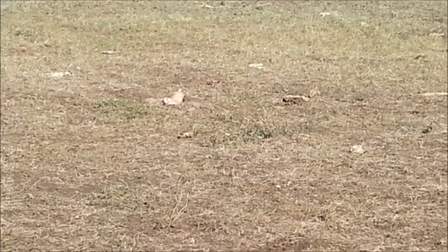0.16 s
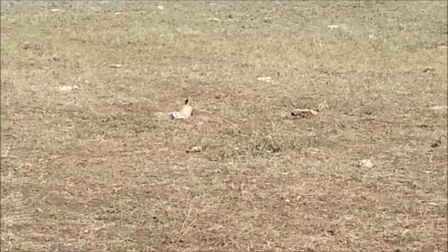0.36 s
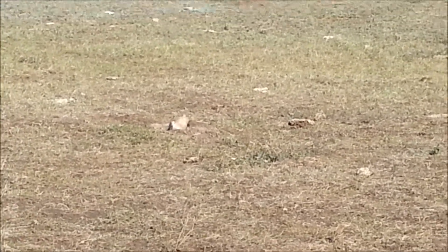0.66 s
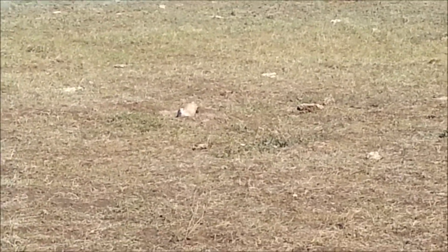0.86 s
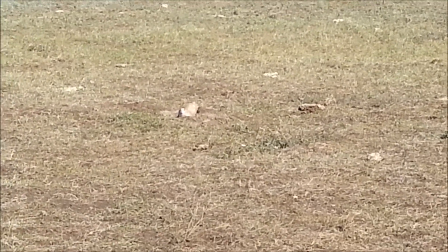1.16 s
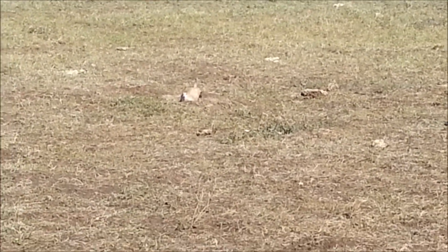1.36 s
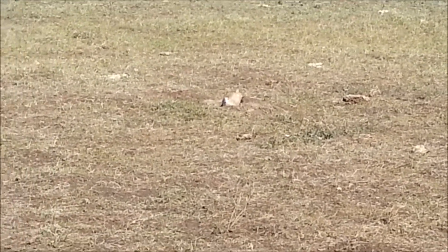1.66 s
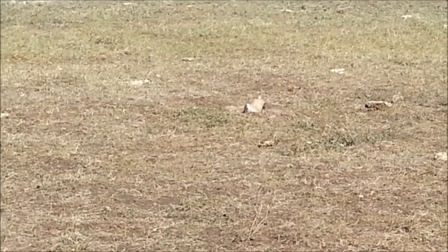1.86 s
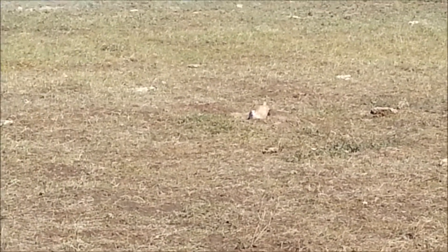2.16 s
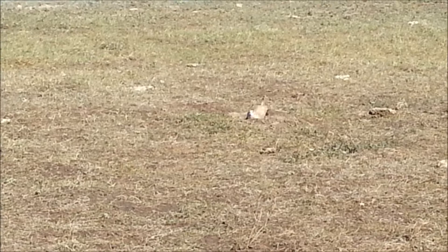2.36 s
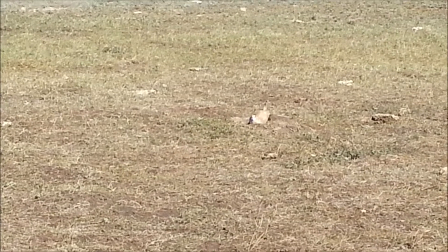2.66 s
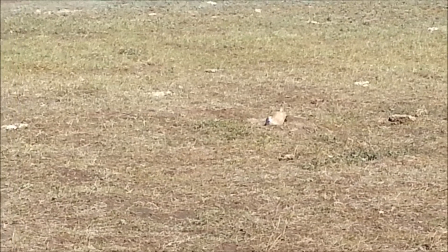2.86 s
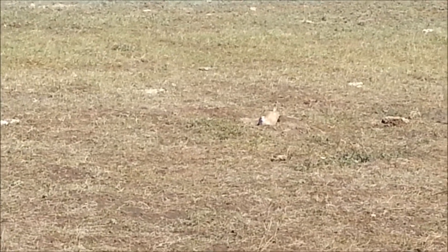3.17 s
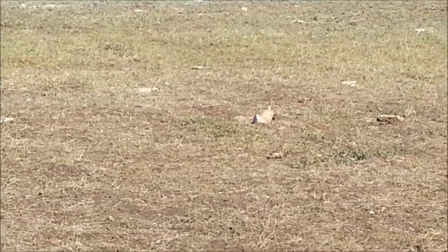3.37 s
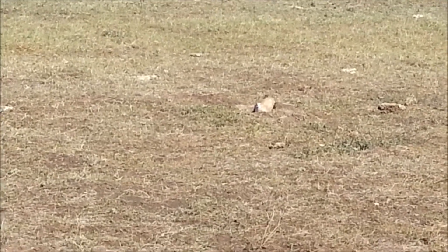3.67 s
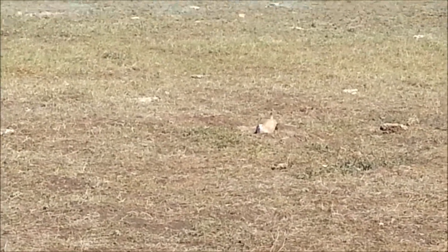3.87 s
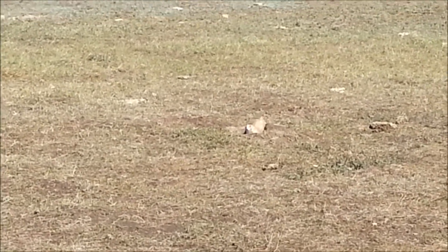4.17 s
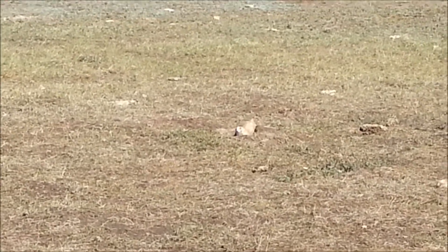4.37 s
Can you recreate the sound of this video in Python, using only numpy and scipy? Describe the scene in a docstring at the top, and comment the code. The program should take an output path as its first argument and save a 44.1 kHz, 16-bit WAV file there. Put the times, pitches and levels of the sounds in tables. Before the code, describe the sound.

A prairie dog gives four short, sharp, rough-edged yips in open grassland while another barks steadily far off and dry grass ticks nearby.

```python
"""Four short arched yips of a near prairie dog that turn rough partway, each trailed by a soft squeak or two.
A second animal barks in a series from far off; dry grass rustles and ticks close by, breeze bumps the left port.
Barks are harmonics and breath noise in throat resonances, squeaks are falling sine tones, grass is noise
grains and damped clicks, and the breeze is filtered noise and low clicks over a steady stereo hiss."""
import sys
import numpy as np
from scipy import signal
from scipy.fft import rfft, irfft, next_fast_len
from scipy.io import wavfile
from scipy.ndimage import uniform_filter1d

SR = 44100
rng = np.random.default_rng(int(sys.argv[2]) if len(sys.argv) > 2 else 0)


def master_out(mix):
    """Clip the mix to full scale and print it as 16-bit PCM to the path in sys.argv[1]."""
    frames = np.transpose(np.atleast_2d(mix))
    ceiling = np.clip(frames, -1, 1)
    pcm = np.round(ceiling * 32767).astype(np.int16)
    wavfile.write(sys.argv[1], SR, pcm)


N = 198869
TIME = np.arange(N) / SR
# throat resonances of the near animal: [f/Hz, width/Hz, level/dB]
THROAT = [(1835, 730, -1), (3595, 467, 7), (3750, 230, -3), (6015, 570, -2), (7740, 320, -15.5),
          (9880, 440, -20)]


def from_db(db):
    """Decibels to gain."""
    return 10 ** (np.asarray(db) / 20)


def rms_one(x):
    """Scale to rms 1."""
    return x / np.sqrt(np.mean(x ** 2) + 1e-20)


def curve(rows, at):
    """Each column of a table, joined by straight lines."""
    key, *columns = np.transpose(rows)
    return [np.interp(at, key, c) for c in columns]


def per_bin(points):
    """A table over log frequency, read at every FFT bin."""
    hz, value = np.transpose(points)
    bin_hz = np.fft.rfftfreq(next_fast_len(N), 1 / SR)
    return np.interp(np.log(bin_hz + 1), np.log(hz), value)


def weigh(x, gain):
    """Filter by a gain for every FFT bin."""
    size = next_fast_len(N)
    return irfft(rfft(x, size) * gain, size)[..., :N]


def colour(x, points):
    """Filter by a table of [f/Hz, gain/dB]."""
    return weigh(x, from_db(per_bin(points)))


def drift(rate, size):
    """Random wander of spread about 1: `rate` new values a second, joined by straight lines."""
    steps = np.arange(size) / SR * rate
    return np.interp(steps, np.arange(size), rng.standard_normal(size)) * np.sqrt(3 / 2)


def resonate(x, hz, width_hz):
    """A resonance applied twice: gain about 1 on top, steep skirts."""
    r = np.exp(-np.pi * width_hz / SR)
    edge = (1 - r * r) / 2
    section = [edge, 0, -edge, 1, -2 * r * np.cos(2 * np.pi * hz / SR), r * r]
    return signal.sosfilt([section, section], x + 1e-18)


def add(track, s, sound):
    """Mix a sound into a track at time s."""
    i = max(round(s * SR), 0)
    track[i:i + len(sound)] += sound[:max(N - i, 0)]


def blip(hz, relative_width, size=1500):
    """One impulse in a heavily damped resonance; peak 1."""
    wave = resonate(signal.unit_impulse(size), hz, hz * relative_width)
    return wave / np.abs(wave).max()


def envelope(t, length, attack_s, release_db_per_s):
    """Straight attack, hold until `length`, exponential release."""
    return np.clip(t / attack_s, 0, 1) * from_db(-release_db_per_s * np.maximum(t - length, 0))


def ground(x, wet_db, t60):
    """Tufts and mounds scatter a brief, faint tail, different at each port."""
    t = np.arange(SR // 4) / SR
    scatter = rng.standard_normal((2, len(t))) * from_db(-60 * t / t60) * (t > .003)
    scatter /= np.sqrt(np.sum(scatter ** 2, axis=1, keepdims=True))
    return x + from_db(wet_db) * signal.fftconvolve(x[None], scatter, axes=1)[:, :N]


def air():
    """Steady outdoor hush and microphone hiss: shaped noise, unrelated at the two ports."""
    # colour of still air and microphone hiss: [f/Hz, relative density/dB per Hz]
    hush_colour = [(20, -40), (45, -15), (90, -2), (150, -1), (270, -7.5), (600, -9.5), (1200, -10.5),
                   (2200, -14.5), (3600, -15), (5000, -20.5), (6500, -23.5), (9500, -20), (14500, -21)]
    # how much louder the air is on the left: [f/Hz, difference/dB]
    balance = [(30, -8), (70, -13.5), (150, 0), (700, -1.5), (2500, 2.5), (5000, 0), (9000, -2)]
    level_db = -55.5
    spectrum_db = per_bin(hush_colour) + np.array([[1], [-1]]) * per_bin(balance) / 2
    return from_db(level_db) * rms_one(weigh(rng.standard_normal((2, N)), from_db(spectrum_db)))


def breeze(rumble_db, eddy_db, bump_db, lumpy_db):
    """Air at the left port: a lumpy rumble and small eddies that follow the breeze, and single strong bumps."""
    # strength of the breeze, ahead of the rumble and eddy gains: [t/s, level/dB]
    strength = [(0.0, -63.5), (0.11, -68), (0.35, -67), (0.9, -56), (1.79, -58), (2.54, -60), (3.39, -53.5),
                (4.27, -61.5), (4.51, -59)]
    # colour of the rumble: [f/Hz, relative density/dB per Hz]
    rumble_colour = [(30, -19), (70, -15), (140, 3.5), (260, 0.5), (400, -7.5), (700, -26), (2000, -29)]
    # strong bumps, ahead of the bump gain and low-pass: [t/s, peak/dB, centre f/Hz]
    strong_bumps = [(0.666, -33, 276), (0.677, -29.5, 255), (0.744, -40, 251), (0.835, -40, 214),
                    (1.003, -34, 292), (1.054, -33, 295), (1.07, -43, 217), (1.09, -41, 230),
                    (1.308, -36, 225), (1.651, -31.5, 394), (1.774, -40, 242), (1.898, -41, 215),
                    (2.311, -39.5, 254), (3.012, -39, 202), (3.376, -36.5, 231), (3.388, -34.5, 284),
                    (3.399, -38, 241), (3.806, -41.5, 200)]
    eddies_per_s, eddy_hz, eddy_spread_db = 20, 238, 3
    bump_width = 0.63   # bandwidth as a share of the centre

    level_db, = curve(strength, TIME)
    lumpy_noise = rng.standard_normal(N) * from_db(lumpy_db * drift(40, N))
    rumble = from_db(level_db + rumble_db) * rms_one(colour(lumpy_noise, rumble_colour))

    kick_gain = from_db(eddy_spread_db * rng.uniform(-1, 1, N))
    kicks = (rng.random(N) < eddies_per_s / SR) * kick_gain
    eddies = rms_one(resonate(kicks, eddy_hz, eddy_hz * bump_width))
    bumps = from_db(level_db + eddy_db) * eddies
    for s, peak_db, hz in strong_bumps:
        add(bumps, s, from_db(peak_db + bump_db) * blip(hz, bump_width))
    bumps = signal.sosfilt(signal.butter(4, 780, fs=SR, output="sos"), bumps)
    # rows are left and right: very little reaches the right port
    return rumble * from_db([[0], [-24]]) + bumps * from_db([[0], [-32]])


def grass(rustle_db, tick_db, grains_per_s):
    """Dry stalks: short rustles of tiny random grains, and clear snaps as damped clicks."""
    # rustles, ahead of the rustle gain: [t/s, length/s, level/dB]
    rustles = [(.105, 0.017, -64), (0.974, .13, -54), (2.9, 0.12, -63.5), (3.239, 0.054, -52),
               (3.33, 0.11, -58), (4.29, 0.031, -56.5), (4.43, .08, -65.5)]
    # colour of the rustle: [f/Hz, gain/dB]
    rustle_colour = [(300, -1.5), (900, 0), (2200, -2), (3800, -5), (5200, -15.5), (14000, -24.5)]
    # stalks snapping, ahead of the tick gain and colour: [t/s, peak/dB, centre f/Hz]
    ticks = [(0.119, -40, 904), (0.294, -40.5, 1860), (0.983, -37.5, 1270), (0.994, -39, 1410),
             (1.08, -39, 1760), (1.095, -34, 1420), (1.14, -42, 1360), (2.232, -46, 920),
             (2.549, -36.5, 1250), (2.715, -41, 2900), (2.952, -44, 850), (3.245, -26.5, 1090),
             (3.256, -25.5, 1220), (4.31, -45.5, 2430)]
    # colour of the snaps: [f/Hz, gain/dB]
    tick_colour = [(300, 11), (600, 1), (1100, -4), (1700, -10.5), (2600, -8.5), (4500, -4.5), (7000, -7),
                   (14000, -14)]
    attack_s, release_db_per_s = 0.0064, 313
    tick_width = 1   # bandwidth as a share of the centre

    stir = from_db(-63.5)   # the grass stirs faintly all the time
    for s, length, level_db in rustles:
        stir = stir + from_db(level_db) * envelope(TIME - s, length, attack_s, release_db_per_s)
    clumping = from_db(2.7 * drift(160, N))
    grains = (rng.random(N) < grains_per_s / SR) * rng.standard_normal(N) * clumping
    rustle = stir * from_db(rustle_db) * rms_one(colour(grains, rustle_colour))

    snaps = np.zeros(N)
    for s, peak_db, hz in ticks:
        add(snaps, s, from_db(peak_db + tick_db) * blip(hz, tick_width))
    snaps = ground(colour(snaps, tick_colour), wet_db=-4, t60=0.012)
    rustle = ground(rustle, wet_db=-2.0, t60=0.016)
    return rustle * from_db([[1], [-3]]) + snaps * from_db([[0], [-1.5]])


def throat(x, resonances, leak_db):
    """Parallel resonances of throat and mouth, with a little treble passing above them."""
    ringing = sum(from_db(db) * resonate(x, hz, width) for hz, width, db in resonances)
    return ringing + from_db(leak_db) * resonate(x, 10200, 3400)


def bark(row, resonances, pitch_arch, flutter_hz, rasp, breath_db, hiss_db, size=3000):
    """Vocal folds on an arch of pitch; partway they break with a rasp into a flutter that splits every harmonic."""
    s, length, top_hz, level_db, fundamental_db, clean, depth = row
    t = np.arange(size) / SR
    along = t / length
    # pitch scoops up, then sags ever faster
    scoop, scoop_s, sag, sag_power = pitch_arch
    arch = 1 - scoop * np.exp(-(t / scoop_s) ** 2) - sag * np.minimum(along, 1.1) ** sag_power
    # it opens abruptly, swells to full strength, holds and is cut off
    attack_s, swell_db, swell_s, release_db_per_s = 0.0024, 10, 0.0092, 3600
    push = envelope(t, length, attack_s, release_db_per_s) * from_db(-swell_db * np.exp(-t / swell_s))

    rough = np.clip((along - clean) * 12, 0, 1)
    # turbulence is strongest just after the break, and where the flutter stays shallow
    burst = rough * from_db(-14 * np.maximum(along - clean, 0) - 5.4 * depth)
    flutter = 2 * np.pi * np.cumsum(flutter_hz * (1 + 0.13 * drift(172, size))) / SR
    jitter = .0045   # pitch unsteadiness of the clean voice, as a share
    pitch = top_hz * arch * (1 + (jitter + rasp * burst) * drift(2523, size))
    phase = 2 * np.pi * np.cumsum(pitch) / SR

    source = from_db(breath_db) * (0.19 + burst) * rng.standard_normal(size)
    # deep flutter presses the voice and thins its fundamental
    pressed_db = -9 * rough * depth
    for k, db in enumerate([fundamental_db + pressed_db, 0, 0, -3, -8, -7, -7], 1):
        sidebands = np.sin(k * phase + flutter) + .55 * np.sin(k * phase - flutter)
        source = source + from_db(db) * (np.sin(k * phase) + rough * depth * sidebands)
    voice = throat(source, resonances, leak_db=-45.5)
    # the push of air sets the loudness, whichever harmonic carries it
    voice = voice / np.sqrt(uniform_filter1d(voice ** 2, size=70) + 1e-4)
    hiss = from_db(hiss_db) * (0.23 + burst) * resonate(rng.standard_normal(size), 13200, 5300)
    return from_db(level_db) * push * (voice + hiss)


def far_dog():
    """A lower-voiced neighbour, dulled by distance: the same kind of bark through fewer throat resonances."""
    # a steady series: [t/s, length/s, top pitch f/Hz, level/dB, share of the bark that stays clean]
    far_barks = [(0.099, 0.026, 1670, -52.5, 0.38), (0.475, 0.039, 1630, -52.5, .4),
                 (0.837, 0.039, 1692, -50.5, 0.18), (1.227, 0.031, 1690, -51, 0.36),
                 (1.583, 0.039, 1626, -51, 0.32), (1.964, 0.03, 1574, -53, 0.87),
                 (2.718, 0.039, 1626, -51, 0.3), (3.055, .037, 1665, -50.5, .3),
                 (3.46, 0.041, 1677, -48, 0.3), (3.849, 0.041, 1543, -51.5, 0.62),
                 (4.224, 0.037, 1640, -51, 0.41)]
    # throat resonances: [f/Hz, width/Hz, level/dB]
    far_throat = [(1690, 680, 0.5), (3020, 430, 0), (7050, 670, -18)]
    # arch of pitch: [scoop/share of top pitch, scoop time/s, sag at the end/share, power of the sag]
    far_arch = (.14, .0085, .185, 1.9)
    fundamental_db, flutter_depth = -1.5, 0.6
    voice = np.zeros(N)
    for s, length, top_hz, level_db, clean in far_barks:
        row = (s, length, top_hz, level_db, fundamental_db, clean, flutter_depth)
        yip = bark(row, far_throat, far_arch, flutter_hz=308.6, rasp=0.07, breath_db=3, hiss_db=-45)
        add(voice, s, yip)
    return ground(voice, wet_db=-13, t60=.07) * from_db([[0], [-7]])


def near_dog():
    """The near animal; its sound reaches the right port a hair earlier and shaded unevenly over the spectrum."""
    # [t/s, length/s, top pitch f/Hz, level/dB, fundamental/dB, share that stays clean, flutter depth 0-1]
    barks = [(0.5205, 0.043, 2084, -25, 1, 0.37, 0.06), (1.4842, 0.042, 2053, -23, 1, 0.56, 0.44),
             (2.3066, 0.042, 1994, -24, -1, 0.41, 0.48), (3.7183, .041, 1988, -24, -4, 0.4, 0.25)]
    # arch of pitch: [scoop/share of top pitch, scoop time/s, sag at the end/share, power of the sag]
    near_arch = (.115, .0065, .175, 2.8)
    # right port relative to the left: [f/Hz, gain/dB]
    shade = [(1000, -4), (1750, -8.5), (2080, -1), (3500, -11.5), (4100, -8.5), (6000, -11.5), (8000, -1.5),
             (14000, 0.5)]
    voice = squeaks(overtone_db=-16.5, waver=.06)
    for row in barks:
        yip = bark(row, THROAT, near_arch, flutter_hz=306.5, rasp=0.043, breath_db=2.0, hiss_db=-20.0)
        add(voice, row[0], yip)
    left, right = ground(voice, wet_db=-19, t60=0.11)
    return np.array([np.roll(left, 1), colour(right, shade)])


def squeaks(overtone_db, waver, size=2000):
    """Weak, unsteady falling notes about an octave below the bark; their overtones ring in the same throat."""
    # soft squeaks after the barks: [t/s, length/s, level/dB]
    squeak_rows = [(0.571, 0.015, -43), (0.639, 0.018, -52.5), (1.535, 0.0257, -44.5), (1.6, 0.02, -48),
                   (2.356, 0.0305, -42), (3.774, 0.014, -48), (3.818, 0.023, -52)]
    start_hz, end_hz = 1001, 846
    out, overtones, t = np.zeros(N), np.zeros(N), np.arange(size) / SR
    for s, length, level_db in squeak_rows:
        along = np.clip(t / length, 0, 1)
        pitch = start_hz + (end_hz - start_hz) * along
        phase = 2 * np.pi * np.cumsum(pitch * (1 + waver * drift(870, size))) / SR
        swell = from_db(level_db) * np.sin(np.pi * along ** 0.65)
        odd = np.sin(phase) + 0.26 * np.sin(3 * phase) + 0.23 * np.sin(5 * phase)
        even_and_breath = 1.1 * np.sin(2 * phase) + np.sin(4 * phase) + 2.3 * rng.standard_normal(size)
        add(out, s, swell * odd)
        add(overtones, s, swell * even_and_breath)
    return out + from_db(overtone_db) * throat(overtones, THROAT, leak_db=-32)


def scene():
    """The hush, the breeze, the grass and both animals."""
    wind = breeze(rumble_db=5.5, eddy_db=-3, bump_db=6.0, lumpy_db=3.5)
    stalks = grass(rustle_db=-5.0, tick_db=6.0, grains_per_s=3200)
    return air() + wind + stalks + far_dog() + near_dog()


def record(dry):
    """The top is cut steeply above 14.7 kHz."""
    return signal.sosfilt(signal.ellip(12, .1, 70, 14700, fs=SR, output="sos"), dry)


dry = scene()
out = record(dry)
master_out(out)
```